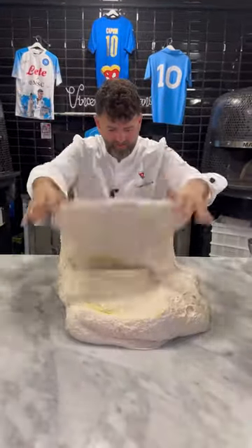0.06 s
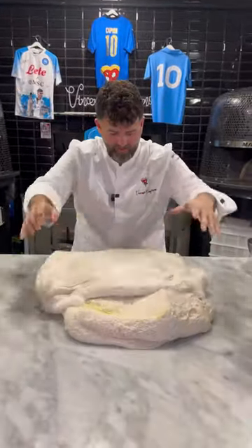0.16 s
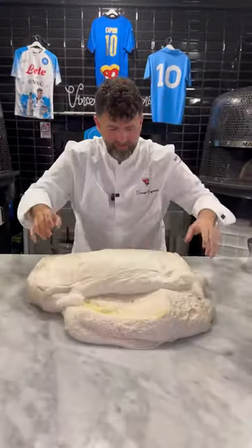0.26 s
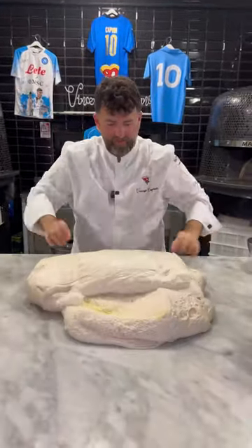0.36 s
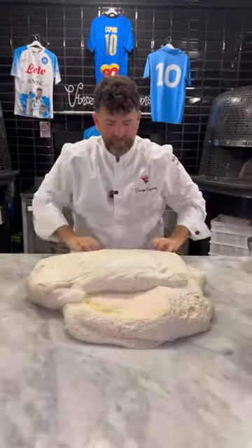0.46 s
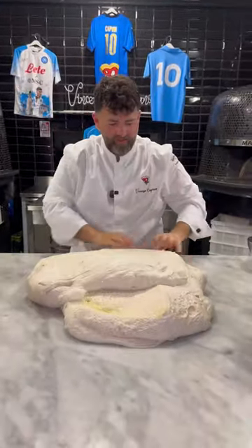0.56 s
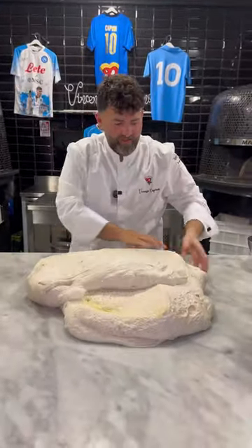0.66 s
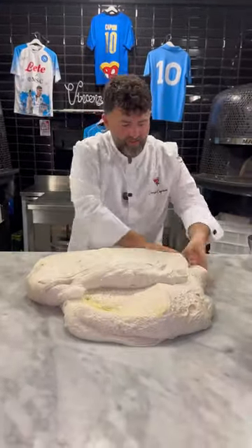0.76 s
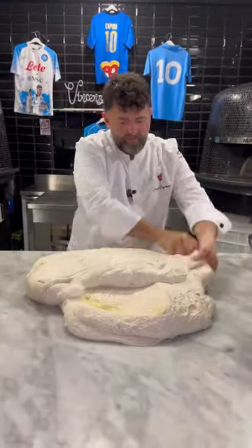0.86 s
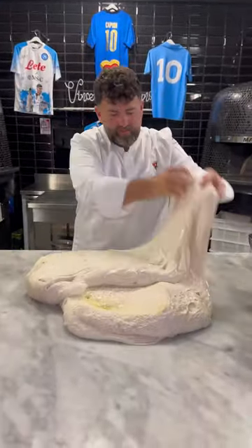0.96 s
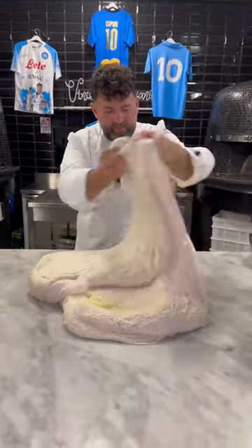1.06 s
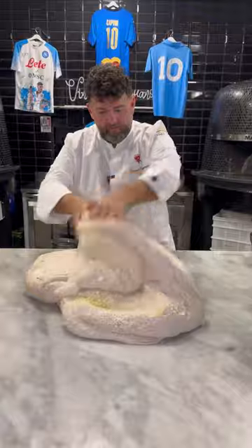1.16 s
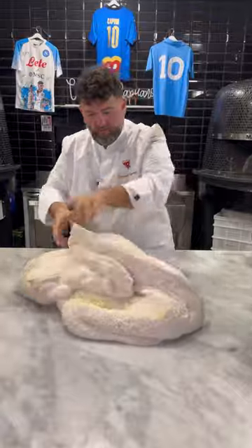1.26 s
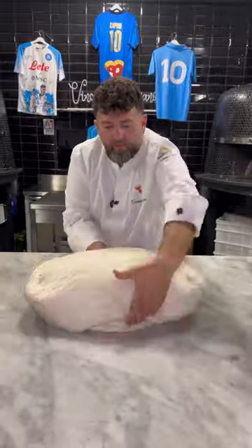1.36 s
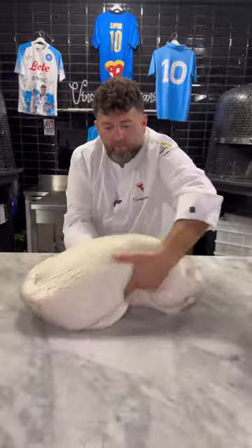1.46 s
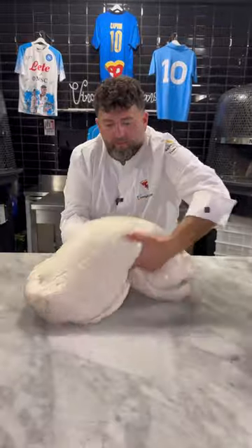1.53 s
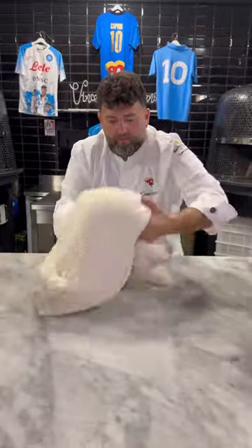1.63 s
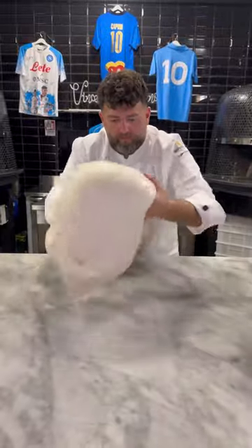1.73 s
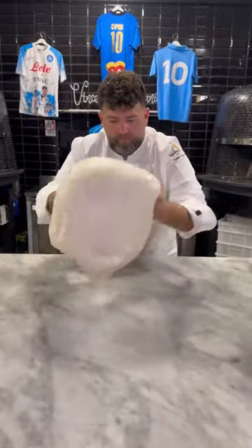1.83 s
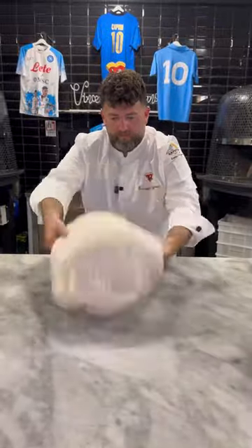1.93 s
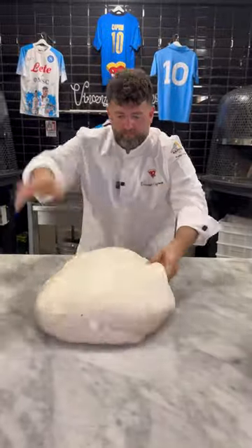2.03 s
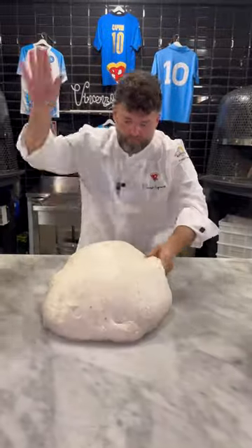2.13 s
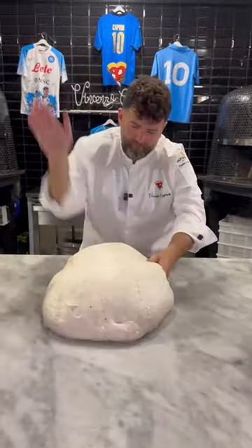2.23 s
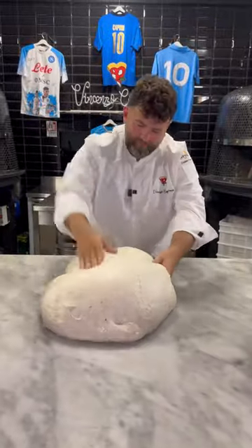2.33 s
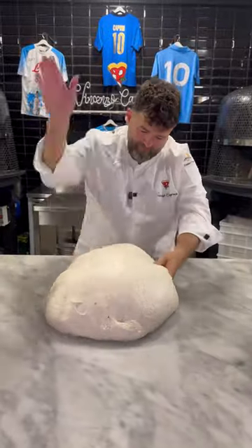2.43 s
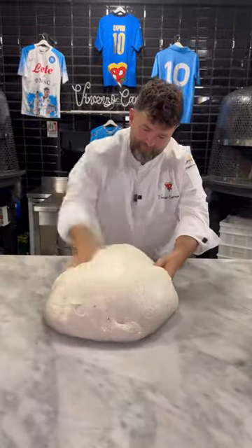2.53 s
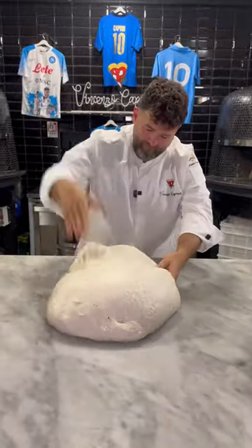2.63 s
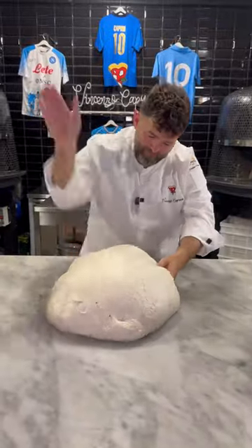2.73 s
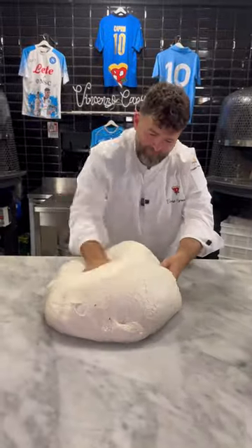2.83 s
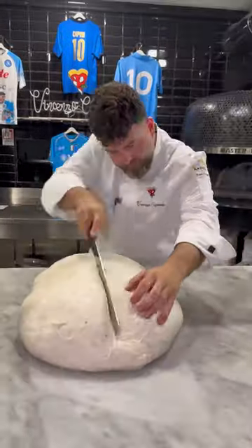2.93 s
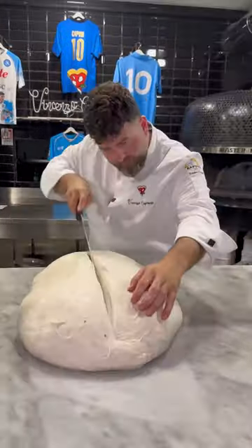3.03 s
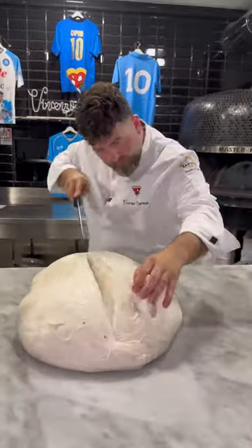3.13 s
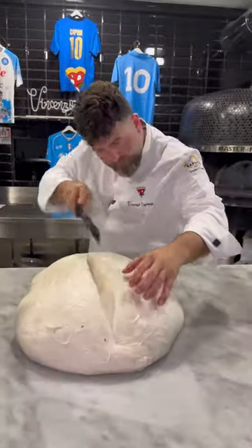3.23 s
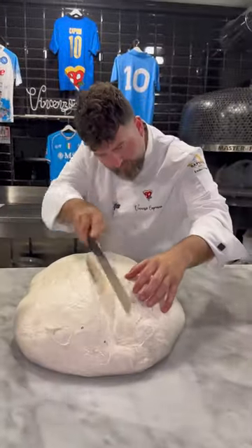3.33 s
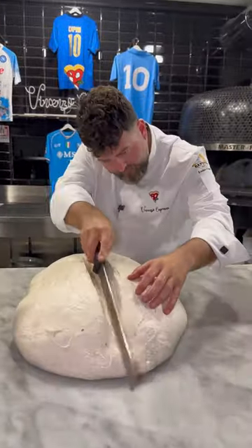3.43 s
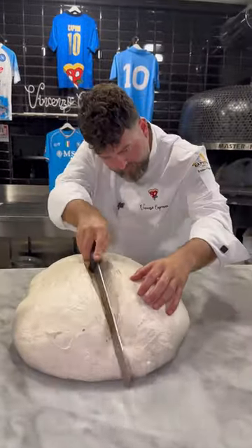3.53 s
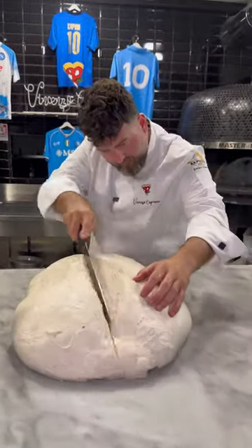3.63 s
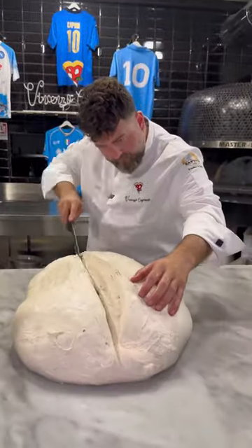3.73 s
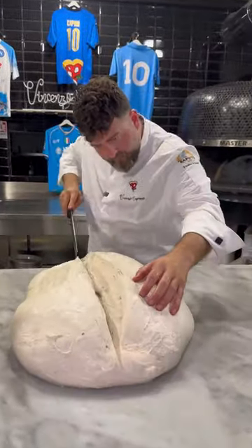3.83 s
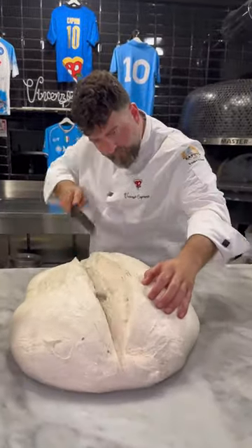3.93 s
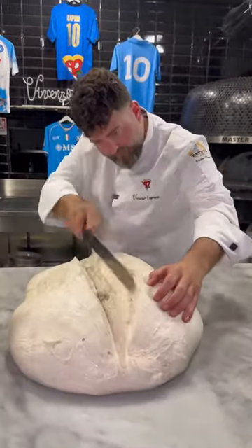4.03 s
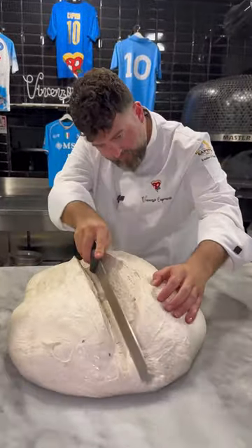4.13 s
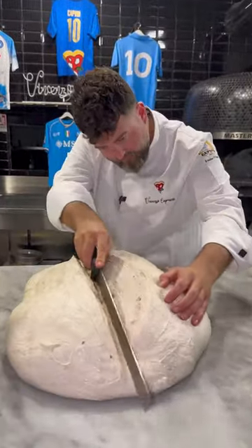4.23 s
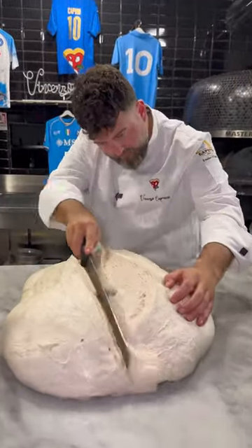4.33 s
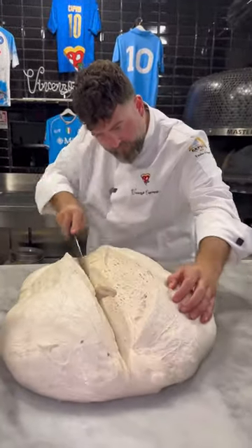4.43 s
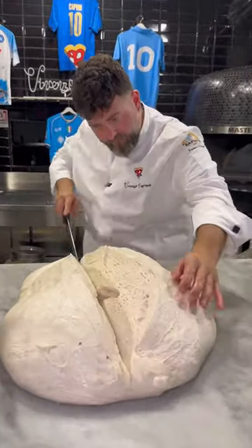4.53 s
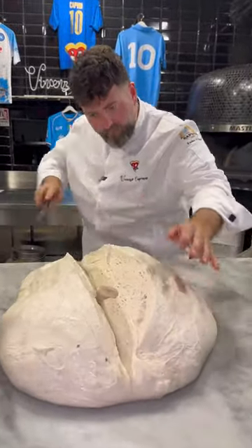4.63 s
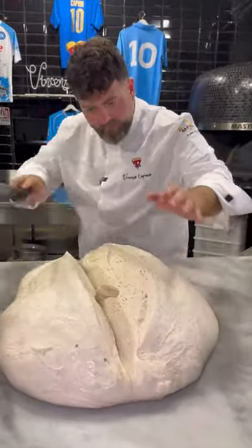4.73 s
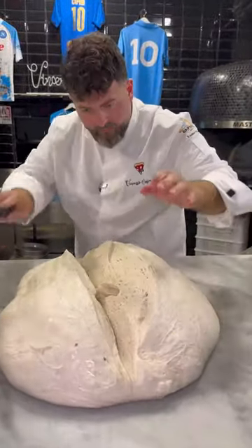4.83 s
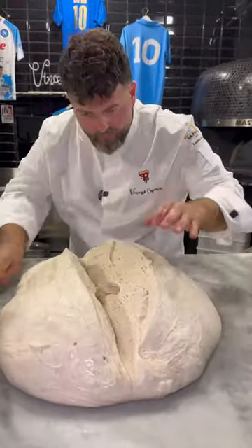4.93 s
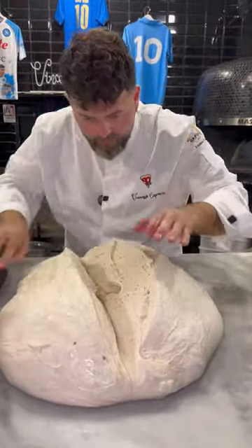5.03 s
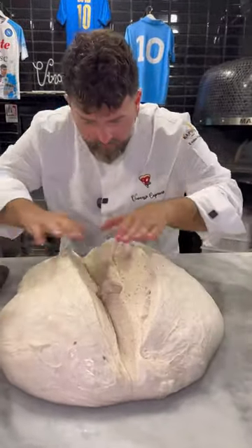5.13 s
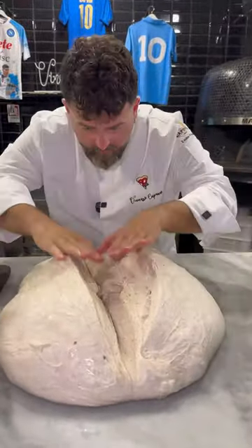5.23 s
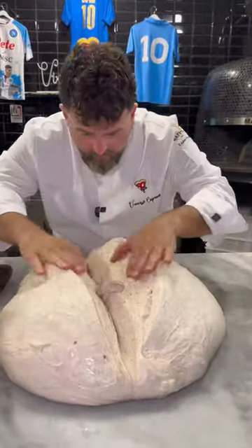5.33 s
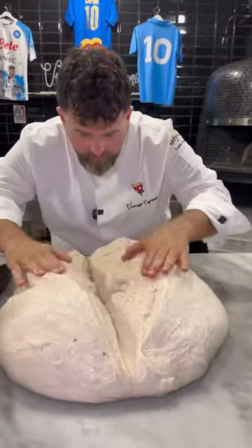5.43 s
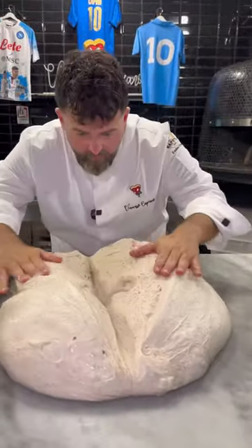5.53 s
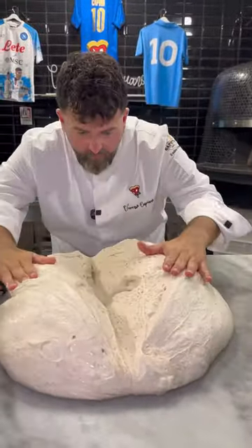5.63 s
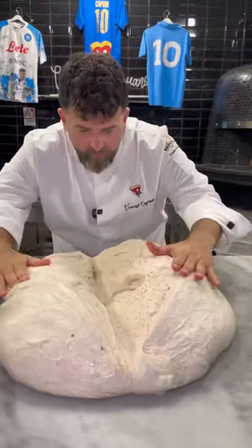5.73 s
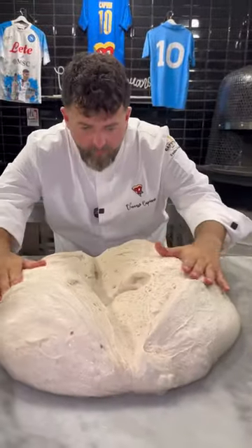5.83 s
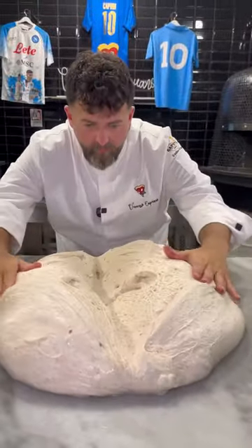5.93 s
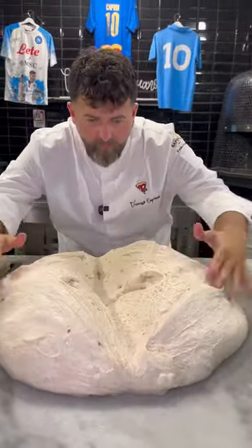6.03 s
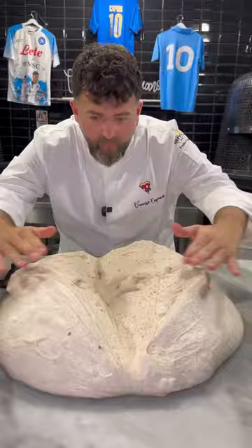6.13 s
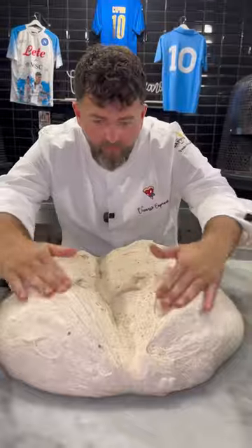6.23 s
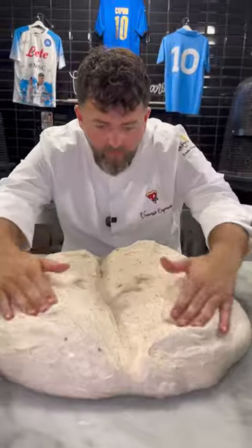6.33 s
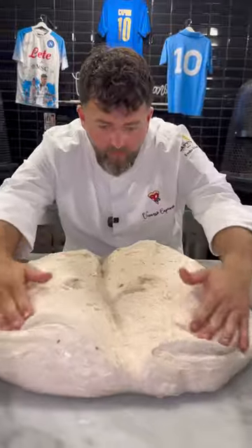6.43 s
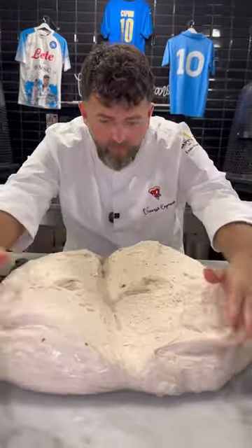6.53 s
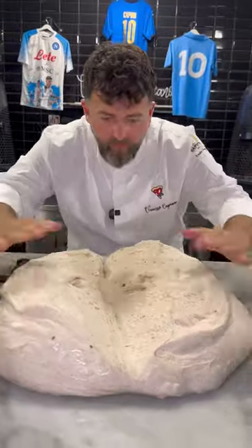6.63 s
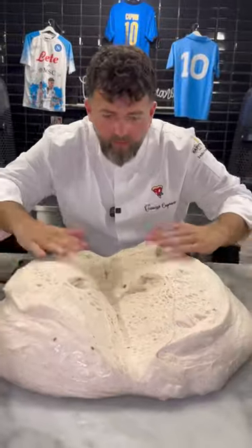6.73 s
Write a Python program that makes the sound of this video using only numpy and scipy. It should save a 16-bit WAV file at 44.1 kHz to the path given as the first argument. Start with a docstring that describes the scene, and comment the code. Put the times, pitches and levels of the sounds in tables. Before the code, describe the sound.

A big mass of wet dough is folded with soft rubs, bumps and sticky spits of air, then lands on a stone counter with a splat. Three loud, booming hand slaps follow, overloading the close microphone. A blade slides quietly through the dough, the steel knife clatters down and bounces to rest, and palms rub the dough again. The tiled kitchen adds a short echo over steady ventilation hum.

```python
"""A big mass of dough is folded, dropped on a stone counter and slapped three times by a baker.
It rubs, spits out air and booms under the hand, and the slaps overload a lapel microphone.
After a jump in time he slits the dough, lets the steel knife clatter down and spreads the halves
with his hands. The tiled kitchen echoes over a steady ventilation hum."""
import sys
import numpy as np
from scipy import signal
from scipy.fft import rfft, irfft, next_fast_len
from scipy.io import wavfile
from scipy.ndimage import map_coordinates

SR = 44100
rng = np.random.default_rng(int(sys.argv[2]) if len(sys.argv) > 2 else 0)


def generate_wav(sig):
    """Save sig (samples, or channels by samples) to the path in sys.argv[1] as 16-bit PCM at SR."""
    pcm = np.round(np.clip(np.atleast_2d(sig).T, -1, 1) * 32767).astype(np.int16)
    wavfile.write(sys.argv[1], SR, pcm)


N = 298597
TIME = np.arange(N) / SR
AGE = np.arange(SR) / SR  # seconds since a blow

# A "colour" says how strong a noise is from bass to treble.
# Each row of these colours: frequency in Hz, relative level in dB.
VENT_COLOUR = [(15, -58), (25, -25.5), (64, -8.5), (97, -19.5), (108, -11), (157, -5), (206, -11),
               (242, -5), (309, -10.5), (591, -15.5), (818, -19), (887, -18), (1330, -24), (3430, -35.5),
               (16000, -51.5)]  # moving air
RUB_COLOUR = [(40, -6), (130, 1.5), (400, 0), (800, -1.5), (1500, -5.5), (2500, -15.5), (5000, -29)]  # the dull part of rubbing
HISS_COLOUR = [(800, -25.5), (2200, 2), (3500, 3), (6000, -3), (10000, -7), (16000, -29)]  # the bright part of rubbing
SPLAT_COLOUR = [(200, -4.5), (450, 1), (800, -2.5), (1450, 1), (1900, -6.5), (2500, -3), (3300, -2),
                (4500, -9), (6500, -10), (11000, -21), (16000, -31.5)]  # air spitting from wet dough
SMACK_COLOUR = [(60, 2), (250, 5), (450, -7), (700, -9.5), (1200, -5), (2200, -11.5), (4300, -17),
                (9500, -16.5), (13000, -28.5), (16000, -31.5)]  # a flat hand on dough
SNAP_COLOUR = [(200, -12), (900, 4), (2500, -11), (6500, -4.5), (10000, -1), (13000, -9.5), (16000, -14.5)]  # bare skin
BOOM_ECHO_COLOUR = [(40, -18.5), (75, -8), (110, 4.5), (155, 0.5), (210, -2), (265, -12), (330, -20.5),
                    (420, -7), (700, -35.5), (2000, -65.5)]  # the room's answer to the booming dough
BLADE_COLOUR = [(3000, -33.5), (5800, -15), (6500, -7), (6950, 0.5), (7700, -0.5), (8100, -3), (8900, 0.5),
                (10300, -4.5), (12300, -9), (13500, -11), (16000, -4.5)]  # the blade's tick
HANDLE_COLOUR = [(30, -31), (90, -9), (180, -10.5), (280, 4), (420, -3.5), (600, -13), (1100, -7),
                 (1450, -8.5), (1850, -6), (2300, -10), (3200, -10.5), (3950, -3.5), (4600, -13.5),
                 (9500, -16), (16000, -26.5)]  # the handle's knock

# Fan and duct tones. Each row: pitch in Hz, level in dB, width in Hz.
FAN_TONES = [(123.4, -55.5, 11), (259, -56, 28), (884, -57.5, 23)]
# Palm or blade sliding over the dough. Each row: moment of top speed in seconds,
# rise in seconds, fall in seconds, rub level in dB, hiss level in dB.
DOUGH_STROKES = [(.07, 0.052, 0.077, -41.5, -54.5), (0.152, 0.022, 0.078, -38.5, -54),
                 (0.401, 0.067, .1, -49, -68), (0.689, 0.056, 0.075, -47.5, -56),
                 (.775, 0.0087, 0.047, -38, -53), (0.881, 0.082, 0.061, -40, -51),
                 (1.021, 0.043, .045, -41, -52.5), (1.224, 0.039, 0.073, -38, -54.5),
                 (1.15, 0.061, 0.037, -47.5, -61.5), (1.357, .005, 0.1, -38.5, -50),
                 (1.478, 0.033, 0.02, -36.5, -47.5), (1.53, 0.037, 0.14, -44, -54.5),
                 (2.965, 0.014, 0.068, -43, -56), (3.094, 0.013, 0.053, -50.5, -56),
                 (3.388, 0.072, 0.063, -37.5, -50), (3.599, 0.067, .22, -46, -61.5),
                 (4.123, 0.089, 0.072, -40, -52.5), (4.449, 0.42, 0.16, -50.5, -63),
                 (4.76, 0.079, 0.062, -54.5, -65.5), (6.04, 0.028, 0.038, -42.5, -54),
                 (6.231, 0.043, .13, -42, -54), (6.509, 0.13, 0.048, -43, -54.5),
                 (6.62, 0.033, 0.044, -39, -55.5)]
# Sticky dough meeting or leaving stone, skin or steel. Each row: start in seconds, level in dB,
# fade time in seconds. A fade time (t60) is how long a sound takes to drop by 60 dB.
STICKY_SPLATS = [(.059, -44, 0.0083), (0.1438, -34.5, 0.034), (0.767, -48, 0.039), (1.2048, -23.5, 0.0029),
                 (1.2307, -44, .018), (1.357, -39, 0.018), (1.645, -42, .03), (1.9248, -41.5, 0.02),
                 (1.9651, -31.5, .025), (1.981, -33, 0.1), (1.9982, -19, .012), (2.0, -7, .015),
                 (2.5515, -33.5, .012), (4.129, -29, 0.013), (4.197, -38, .011), (6.23, -41, .02)]
# Soft bumps of hands and dough. Each row: peak moment in seconds, level in dB, pitch in Hz,
# length on either side of the peak in cycles.
SOFT_BUMPS = [(0.062, -18, 197, 0.55), (0.116, -27.5, 385, 1.6), (0.168, -21.5, 230, .3),
              (.802, -22.5, 218, .4), (1.206, -12.5, 440, 0.48), (1.275, -24.5, 196, 0.53),
              (1.348, -25, 145, 0.19), (1.558, -27.5, 660, 0.56), (1.579, -31.5, 205, 0.95),
              (1.967, -26, 694, 0.52), (1.981, -27, 164, 1.4), (1.9962, -20.5, 338, 0.51),
              (2.0081, -13, 119, 0.81), (2.0598, -19.5, 260, .45), (2.5525, -13.5, 330, 0.34),
              (3.072, -21.5, 486, 0.62), (3.076, -22, 146, 0.26), (3.23, -28, 254, .49),
              (3.779, -25.5, 350, 0.48), (4.0542, -19, 242, 0.5), (4.555, -23.5, 148.3, 0.43),
              (6.479, -18, 330, 0.36)]
# A flat hand hits the dough. Each row: start in seconds, smack level in dB, boom level in dB,
# dough pitch in Hz, pitch of the palm's pop in Hz, pop level in dB, relative echo level in dB.
HAND_SLAPS = [(2.3105, 1.5, 11.5, 130.3, 1060, -7.5, -5), (2.5760, 1, 8.5, 140, 2200, 3.5, -6),
              (2.8240, 3, 12.5, 143.7, 1730, 0.5, -2.5)]
# The knife lands and bounces. Each row: start in seconds, blade level in dB, handle level in dB.
KNIFE_BOUNCES = [(4.9605, -11, -17.5), (4.9654, -7.5, -17.5), (4.9668, -12, -14), (4.969, -2, -5),
                 (5.0446, -16, -49), (5.053, -13.5, -30), (5.1289, -19, -45), (5.138, -28, -48.5),
                 (5.156, -50, -30.5), (5.173, -50, -32), (5.1984, -16.5, -39), (5.207, -19.5, -40),
                 (5.2459, -34, -63)]

# Tones of struck things. Each row: pitch in Hz, relative level in dB, fade time in seconds.
DOUGH_TONES = [(76, -13, 0.1), (162, -20, .17), (257, -12.5, 0.073), (412, -10, 0.048)]  # the slapped mass, besides its main pitch
STEEL_TONES = [(6277, -14, .25), (6977, -4, .2), (7600, -4, .2), (8750, 1, .06), (9300, -1, .1),
               (9647, -5, 0.1197), (9800, -3, .12), (11640, -11.5, .15)]  # the thin blade
WORKTOP_TONES = [(81.6, -18, .2), (271.6, -0.5, 0.16), (278.6, -16, 0.77), (393, -14.5, .13),
                 (773, -25, 0.34), (1125, -19, .17), (1770, -23, 0.418), (1920, -27.5, 0.61),
                 (2405, -20, .13), (2540, -35, .45), (2920, -13, .08), (3570, -32.5, .6), (4080, -7, .06),
                 (4657, -16.5, .07), (5000, -38.5, .65)]  # knife and worktop ringing together
# The echo of the tiled kitchen. Each row: frequency in Hz, fade time in seconds.
KITCHEN_FADES = [(100, 0.18), (260, 0.65), (700, .55), (1840, 0.48), (4850, 0.47), (9000, .42),
                 (15000, 0.32)]


def amp(db):
    """Turn decibels into a number to multiply by."""
    return 10 ** (np.asarray(db) / 20)


def unit(x):
    """Scale a sound to an average strength (rms) of 1."""
    return x / np.sqrt(np.mean(x ** 2) + 1e-20)


def along(points, hz):
    """Read between a table's rows, with every octave equally wide."""
    frequencies, values = np.transpose(points)
    return np.interp(np.log(hz + 1), np.log(frequencies + 1), values)


def filtered(x, response):
    """Multiply each frequency in a sound by response(hz)."""
    size = next_fast_len(len(x) + SR // 4)
    return irfft(rfft(x, size) * response(np.fft.rfftfreq(size, 1 / SR)), size)[:len(x)]


def noise(colour, size):
    """Noise of the given colour, at strength 1."""
    return unit(filtered(rng.standard_normal(size), lambda hz: amp(along(colour, hz))))


def band(centre, width, size):
    """A fuzzy tone: noise gathered around one pitch, at strength 1."""
    return unit(filtered(rng.standard_normal(size), lambda hz: 1 / (1 + ((hz - centre) / width) ** 2)))


def wobble(rate):
    """A smooth curve through `rate` random values a second."""
    return map_coordinates(rng.standard_normal(int(N * rate / SR) + 4), [TIME * rate / SR])


def fade(t60):
    """Die away by 60 dB every t60 seconds."""
    return np.exp(-np.log(1000) * AGE / t60)


def ring(tones, scatter_db):
    """A struck thing's fading tones, with new strengths at each blow."""
    return sum(amp(db + scatter_db * rng.standard_normal()) * fade(t60) * np.sin(2 * np.pi * hz * AGE)
               for hz, db, t60 in tones)


def add(track, s, sound):
    """Mix a sound into the track, starting at s seconds."""
    start = max(round(s * SR), 0)
    part = track[start:start + len(sound)]
    part += sound[:len(part)]


def echo(colour, build_s=0.0078, ripple_db=2.2, spacing_hz=70):
    """The tiles' echo, of energy 1: it builds up, then dies fastest in deep bass and high treble."""
    # near surfaces strengthen some frequencies and cancel others
    ripple = ripple_db * rng.standard_normal(1000)
    wash = filtered(noise(colour, SR), lambda hz: amp(np.interp(hz / spacing_hz, np.arange(1000), ripple)))
    hz, t, bands = signal.stft(wash, SR, nperseg=256)
    decay = np.exp(-np.log(1000) * t / along(KITCHEN_FADES, hz)[:, None])
    tail = signal.istft(bands * decay, SR, nperseg=256)[1][:SR]
    tail *= 1 - np.exp(-(AGE / build_s) ** 2)
    return tail / np.linalg.norm(tail)


def in_room(blow, colour, echo_db):
    """A blow followed by an echo of the given colour."""
    return blow + amp(echo_db) * np.linalg.norm(blow) * echo(colour)


def burst(colour, t60, echo_db):
    """A short crack of noise with its echo."""
    crack = unit(noise(colour, SR) * fade(t60)) * np.sqrt(np.mean(fade(t60) ** 2))
    return in_room(crack, colour, echo_db)


def ventilation():
    """Air rushes steadily under a few fuzzy fan tones."""
    air = amp(-47.5) * noise(VENT_COLOUR, N)
    return air + sum(amp(db) * band(hz, width / 2, N) for hz, db, width in FAN_TONES)


def rubbing(sleeve_rub_db=-61, sleeve_hiss_db=-67, grain_db=9, slip_db=2.5, crackles_per_s=200):
    """Strokes swell and fade: tiny sticky slips roughen a rub and a hiss, and gas bubbles crackle."""
    # the sleeves rustle until the knife lands
    sleeves = amp(2 * wobble(8)) * (TIME < KNIFE_BOUNCES[0][0])
    rub, hiss = amp(sleeve_rub_db) * sleeves, amp(sleeve_hiss_db) * sleeves
    for s, rise, fall, rub_db, hiss_db in DOUGH_STROKES:
        speed = np.exp(-((TIME - s) / np.where(TIME < s, rise, fall)) ** 2)
        rub = np.hypot(rub, amp(rub_db) * speed)
        hiss = np.hypot(hiss, amp(hiss_db) * speed)
    slips = amp(-grain_db * wobble(900) + slip_db * wobble(70))
    bubbles = (rng.random(N) < crackles_per_s / SR) * rng.standard_normal(N)
    crackle = amp(-7) * unit(filtered(bubbles, lambda hz: amp(along(HISS_COLOUR, hz))))
    dull = unit(slips * noise(RUB_COLOUR, N))
    bright = unit(slips * noise(HISS_COLOUR, N)) + crackle
    return rub * dull + hiss * bright


def splats():
    """Air spits out where wet dough meets or leaves a surface."""
    out = np.zeros(N)
    for s, db, t60 in STICKY_SPLATS:
        add(out, s, amp(db) * burst(SPLAT_COLOUR, t60, echo_db=-10.5))
    return out


def nudges(over_rub_db=5, typical_hz=190, pitch_spread=0.39, cycles=0.64):
    """Each stroke also nudges the dough. Gives rows like those of SOFT_BUMPS."""
    chance = rng.standard_normal((len(DOUGH_STROKES), 2))
    return [(s + fall * abs(late) / 2, db + over_rub_db, typical_hz * np.exp(pitch_spread * high), cycles)
            for (s, _, fall, db, _), (late, high) in zip(DOUGH_STROKES, chance)]


def bumps():
    """Soft pushes on the dough swell and die within a cycle or two, and the room answers."""
    out = np.zeros(N)
    t = AGE[:SR // 10] - 1 / 20  # seconds from the peak
    for s, db, hz, cycles in SOFT_BUMPS + nudges():
        push = amp(db) * np.cos(2 * np.pi * hz * t) * np.exp(-(hz * t / cycles) ** 2)
        add(out, s + t[0], push)
        echo_colour = [(hz / 10, -25), (hz, 0), (hz * 10, -45)]
        add(out, s, amp(-10.5) * np.linalg.norm(push) * echo(echo_colour))
    return out


def slaps(sag=0.58, sag_s=0.0071, sink_s=0.023, time_jump_s=2.939):
    """The sleeve swishes, skin smacks, air pops from under the palm, and the gassy dough booms."""
    out = np.zeros(N)
    for s, smack_db, boom_db, dough_hz, pop_hz, pop_db, room_db in HAND_SLAPS:
        swish = amp(-29) * noise(RUB_COLOUR, SR) * fade(0.049)[::-1]  # swells up to the hit
        add(out, s - 1, swish)
        smack = burst(SMACK_COLOUR, t60=0.04, echo_db=room_db)
        snap = amp(-1) * noise(SNAP_COLOUR, SR) * fade(0.004)
        pop_colour = [(pop_hz / 10, -40), (pop_hz / 2, -8), (pop_hz, 0),
                      (pop_hz * 2, -17), (pop_hz * 10, -60)]
        pop = amp(pop_db) * burst(pop_colour, t60=0.011, echo_db=room_db)
        # the boom swells and its pitch sags as the hand sinks in
        cycles = dough_hz * (AGE + sag * sag_s * (1 - np.exp(-AGE / sag_s)))
        tones = np.sin(2 * np.pi * cycles) * fade(0.052) + ring(DOUGH_TONES, scatter_db=4)
        swell = 1 - fade(sink_s)
        boom = in_room(amp(boom_db) * tones * swell, BOOM_ECHO_COLOUR, echo_db=room_db - 8.5)
        add(out, s, amp(smack_db) * (smack + snap) + pop - boom)
    return out * (TIME < time_jump_s)  # the last echo stops short


def knife():
    """The heavy handle rings the worktop; the springy blade ticks on in ever smaller bounces."""
    out = np.zeros(N)
    for s, blade_db, handle_db in KNIFE_BOUNCES + rocking():
        tick = burst(BLADE_COLOUR, t60=0.023, echo_db=-18)
        steel = amp(-26.5) * ring(STEEL_TONES, scatter_db=-2)
        knock = burst(HANDLE_COLOUR, t60=0.056, echo_db=-5.5)
        worktop = amp(-1) * ring(WORKTOP_TONES, scatter_db=-0.5) * (1 - fade(0.11))
        add(out, s, amp(blade_db) * (tick + steel) + amp(handle_db) * (knock + worktop))
    return out


def rocking(start_s=5.2852, first_gap_s=0.0172, slowing=1.2, first_db=-27, loss_db=3.5, count=5):
    """The knife rocks to rest in ever weaker, slower ticks. Gives rows like those of KNIFE_BOUNCES."""
    ticks = np.arange(count)
    gaps = first_gap_s * slowing ** ticks
    blade_db = first_db - loss_db * ticks
    handle_db = blade_db - 19
    return list(zip(start_s + np.cumsum(gaps) - gaps, blade_db, handle_db))


def scene():
    """All the sounds meet at one microphone."""
    return (slaps() + splats() + bumps() + rubbing() + knife() + ventilation())[None]


def record(dry, clip_hardness=8, low_cut_hz=40, top_hz=16050):
    """The microphone drops the deepest bass, flattens loud peaks and loses the highest treble."""
    x = signal.sosfilt(signal.butter(2, low_cut_hz, "highpass", fs=SR, output="sos"), dry[0])
    clipped = x / (1 + np.abs(x) ** clip_hardness) ** (1 / clip_hardness)
    return filtered(clipped, lambda hz: 1 / (1 + (hz / top_hz) ** 120))[None]


dry = scene()
out = record(dry)
generate_wav(out)
```